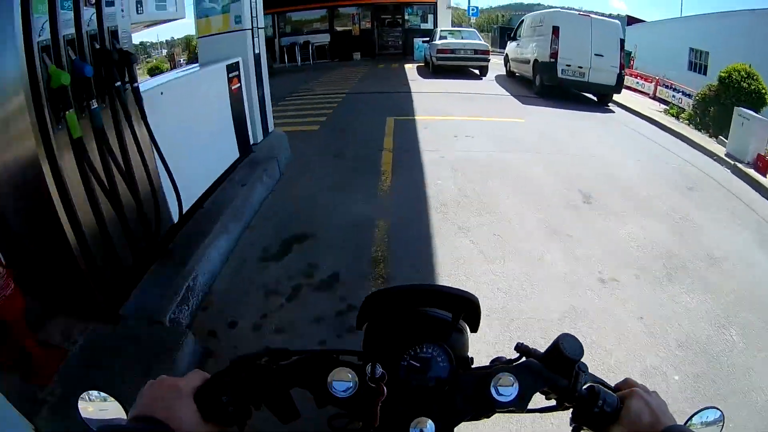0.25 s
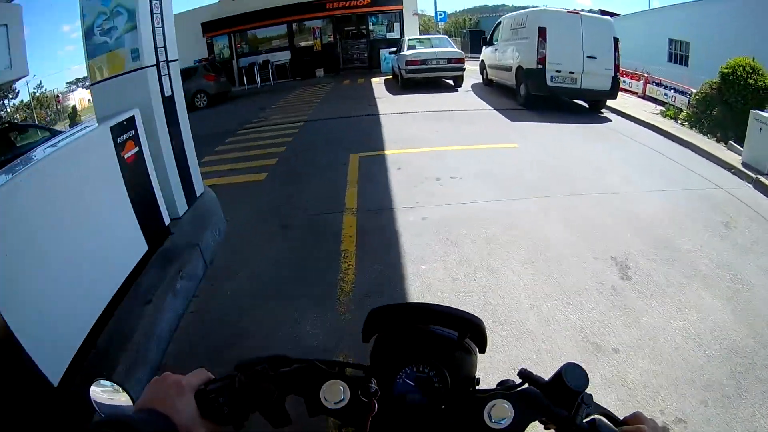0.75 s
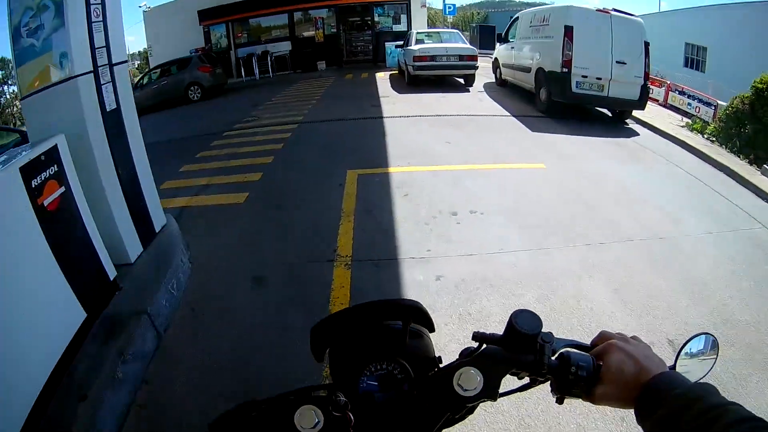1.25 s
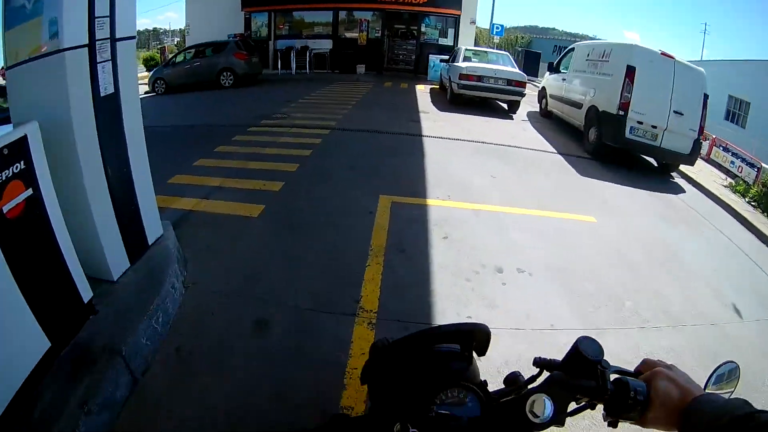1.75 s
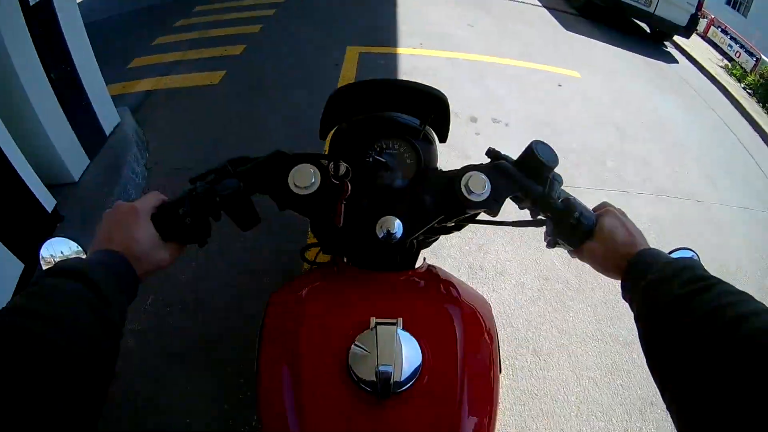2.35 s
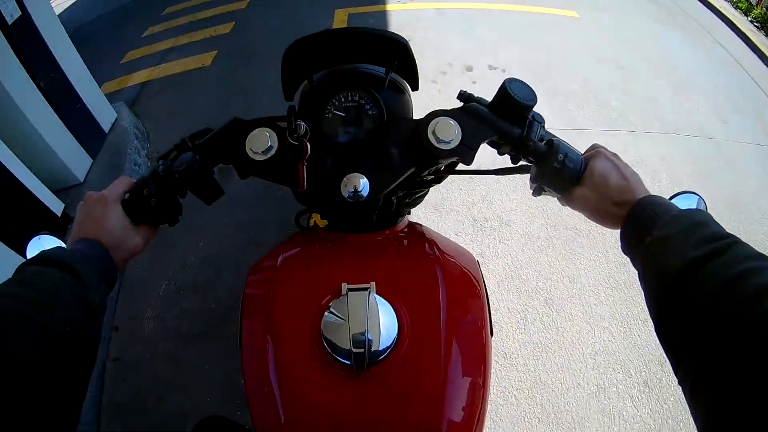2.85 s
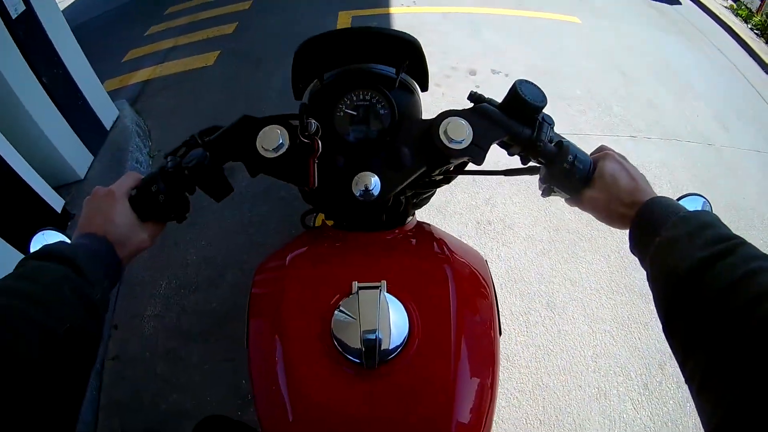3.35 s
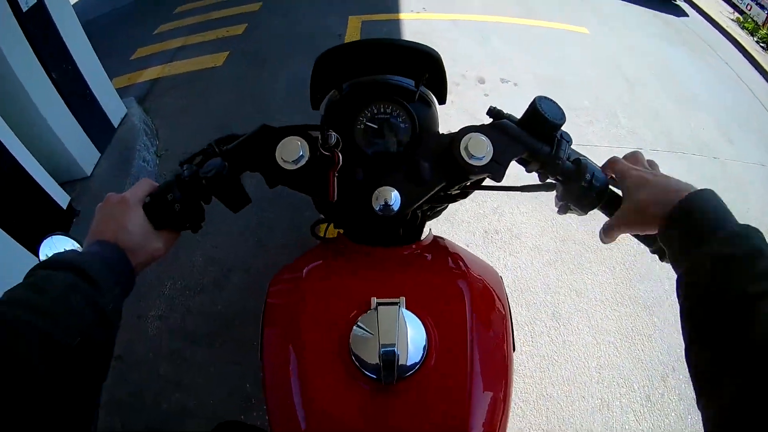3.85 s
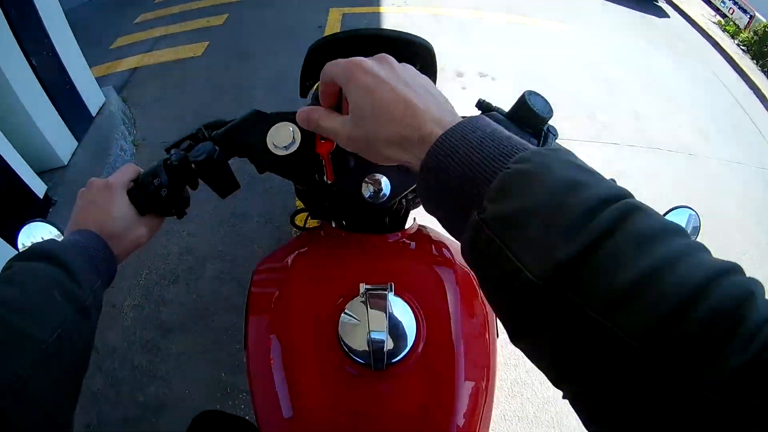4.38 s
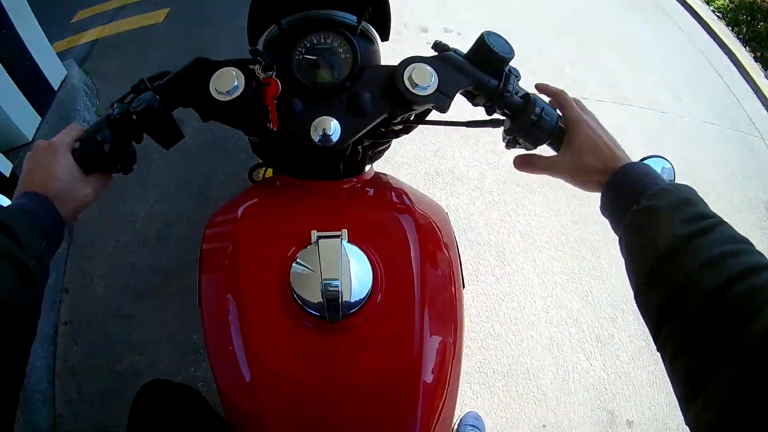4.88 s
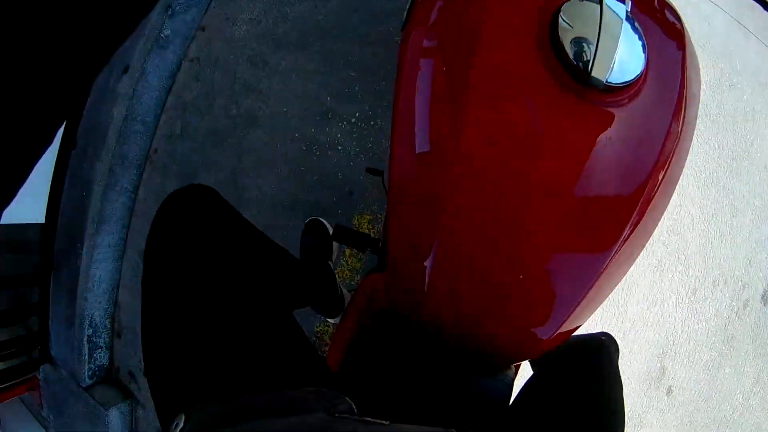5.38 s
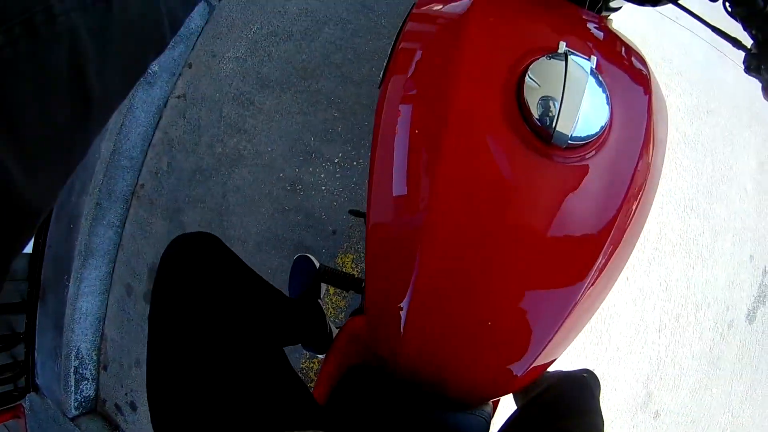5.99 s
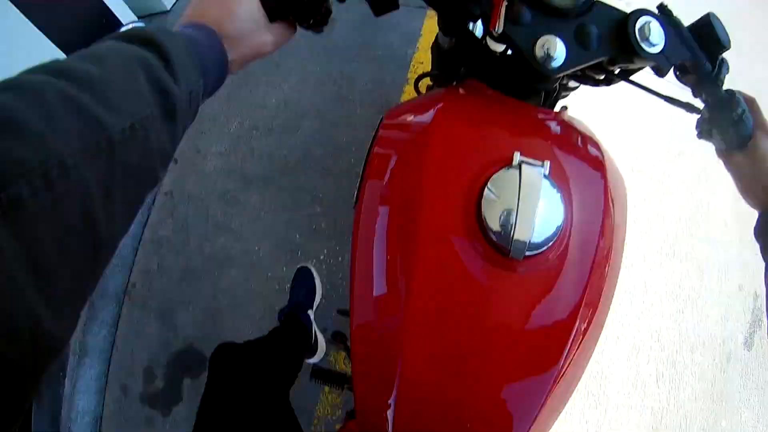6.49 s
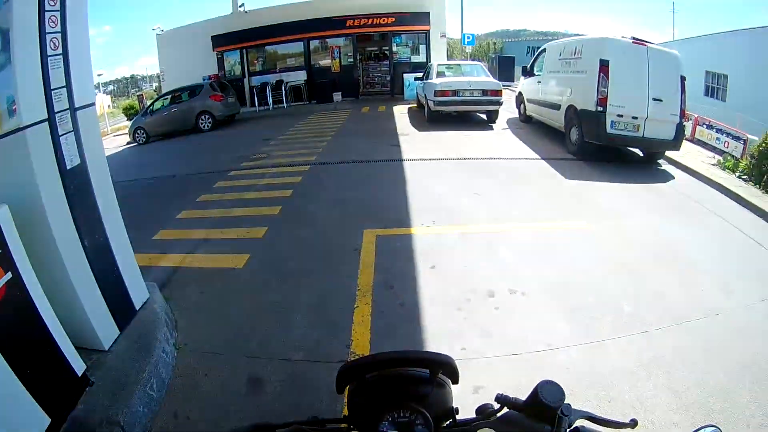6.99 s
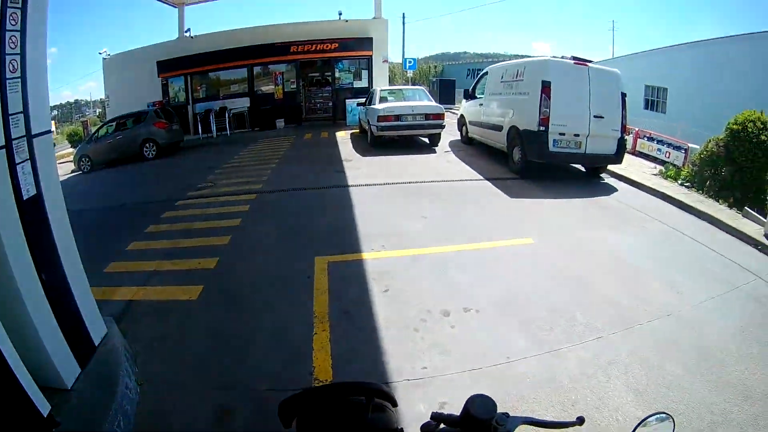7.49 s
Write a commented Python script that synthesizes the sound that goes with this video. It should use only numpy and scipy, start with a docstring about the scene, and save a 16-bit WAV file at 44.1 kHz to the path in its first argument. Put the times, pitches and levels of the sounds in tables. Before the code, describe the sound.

A motorcycle idles quietly at a fuel station and is switched off, then loud knocks and rubbing hit the microphone.

```python
"""A single-cylinder motorcycle idles over the traffic noise of a fuel station forecourt, each firing
ringing the exhaust, until the key clicks and it coasts to rest. The rider then handles the camera worn
on his body: hard knocks ring its plastic case and overload the microphone, the mount scrapes and
squeaks, and fingers bump and rub across the case."""
import sys
import numpy as np
from scipy import signal
from scipy.fft import rfft, irfft, next_fast_len
from scipy.io import wavfile

SR = 44100
rng = np.random.default_rng(int(sys.argv[2]) if len(sys.argv) > 2 else 0)


def to_wav(sig):
    """Store sig (one row per channel, or 1-D mono) as 16-bit WAV at the path in sys.argv[1].

    Samples outside -1..1 are clipped; the rate is SR.
    """
    pcm = np.clip(np.atleast_2d(sig), -1, 1) * 32767
    pcm = np.round(pcm).astype(np.int16)
    wavfile.write(sys.argv[1], SR, pcm.T)  # frames by channels


N = 340893
TIME_S = np.arange(N) / SR
STROKE_TIME_S = TIME_S[:round(.4 * SR)]  # time axis of one friction stroke


def amp(db):
    """Decibels to gain."""
    return 10 ** (np.asarray(db) / 20)


def unit_rms(x):
    """Scales to rms 1."""
    return x / np.sqrt(np.mean(x ** 2) + 1e-20)


def curve(rows, column=1):
    """One column of a time table, at every sample."""
    rows = np.array(rows)
    return np.interp(TIME_S, rows[:, 0], rows[:, column])


def spectrum_gain(spectrum, hz):
    """Gain of a spectrum table at hz."""
    points_hz, db = np.transpose(spectrum)
    return amp(np.interp(np.log(hz + 1), np.log(points_hz + 1), db))


def shaped(x, spectrum):
    """Filters x by (freq_hz, gain_db) points; rms 1."""
    size = next_fast_len(N)
    gain = spectrum_gain(spectrum, np.fft.rfftfreq(size, 1 / SR))
    return unit_rms(irfft(rfft(x, size) * gain, size)[:N])


def low_pass(x, hz, order):
    """Rolls off above hz."""
    return signal.sosfilt(signal.butter(order, hz, fs=SR, output="sos"), x)


def drift(rate_hz):
    """Smooth random wander; rms 1."""
    return unit_rms(low_pass(rng.standard_normal(N), rate_hz, order=2))


def add(mix, start_s, sound):
    """Mixes a sound in at start_s."""
    part = mix[max(round(start_s * SR), 0):][:len(sound)]
    part += sound[:len(part)]


def ring(hz, t60_s, size=4096):
    """One struck mode."""
    t = TIME_S[:size]
    return np.sin(2 * np.pi * hz * t) * np.exp(-np.log(1000) * t / t60_s)


def resonate(x, hz, t60_s):
    """Passes x twice through one mode; rms 1."""
    mode = ring(hz, t60_s)
    return unit_rms(signal.oaconvolve(x, signal.fftconvolve(mode, mode))[:len(x)])


def minimum_phase(gain):
    """The sharpest one-sided pulse with this spectrum; peak 1."""
    log_gain = np.log(np.concatenate([gain, gain[-2:0:-1]]) + 1e-6)
    pulse = np.fft.ifft(np.exp(np.conj(signal.hilbert(log_gain)))).real
    return pulse / abs(pulse).max()


def grit(slips_per_s, spread_db, hiss_gain, size=N):
    """Friction: tiny uneven slips over a smooth hiss; rms 1."""
    slips = (rng.random(size) < slips_per_s / SR) * rng.standard_normal(size)
    slips *= amp(spread_db * np.minimum(rng.exponential(1, size), 4))
    return unit_rms(unit_rms(slips) + hiss_gain * rng.standard_normal(size))


KEY_OFF_S, DIE_AWAY_S = 4.28, .082
# Idle stumbles: time_s, rate_drop_hz
STUMBLES = [(1.37, 1.8), (1.85, 1.8), (2.64, 1.6), (2.96, 3.2)]
# Firing strength: time_s, level_db
FIRING_LEVEL = [(0, -54), (.6, -56.5), (1.9, -56), (2.4, -54.5), (3.1, -55.5), (4.2, -55)]
# Firings that barely catch: time_s, dip_db
MISFIRES = [(.45, -8), (2.02, -6), (2.96, -11)]
def crank(idle_hz=13.043, start_cycle=.109, recover_s=.151, misfire_s=.04, coast_s=.65, pumping_db=-11):
    """Cycles run and stroke strength; after key-off the strokes only pump air and coast to rest."""
    sag_hz = sum(drop * (TIME_S > s) * np.exp(-abs(TIME_S - s) / recover_s) for s, drop in STUMBLES)
    off_s = np.maximum(TIME_S - KEY_OFF_S, 0)
    rate_hz = (idle_hz - sag_hz) * np.maximum(1 - off_s / coast_s, 0)
    misfire_db = sum(db * np.exp(-((TIME_S - s) / misfire_s) ** 2) for s, db in MISFIRES)
    cut_db = pumping_db * (1 - np.exp(-off_s / DIE_AWAY_S))
    strength = amp(curve(FIRING_LEVEL) + misfire_db + cut_db) * np.sqrt(rate_hz / idle_hz)
    return start_cycle + np.cumsum(rate_hz) / SR, strength


# Exhaust and frame modes: freq_hz, level_db, t60_s
EXHAUST_MODES = [(60.5, 1.5, 0.17), (98.4, 1, 0.081), (159.4, -5.5, .07), (226, -23, 0.13),
                 (272.3, 3, 0.17), (309.5, 2.5, 0.055), (428, -3, 0.041), (466, -11.5, 0.24)]
def engine(thump_db=10, thump_cutoff_hz=560, puff_s=.022, valve_gear_db=-8):
    """Every second turn a firing rings the exhaust and puffs out gas; the valve gear rustles along."""
    cycles, strength = crank()
    firings = np.flatnonzero(np.diff(np.floor(cycles)) > 0)
    thumps, kicks = np.zeros(N), np.zeros(N)
    kicks[firings] = 1
    for at, scatter in zip(firings, rng.standard_normal((len(firings), len(EXHAUST_MODES), 2))):
        modes = sum(amp(db + 2 * weight) * ring(hz * (1 + .02 * detune), t60_s, size=6144)
                    for (hz, db, t60_s), (weight, detune) in zip(EXHAUST_MODES, scatter))
        add(thumps, at / SR + .00239, strength[at] * modes)
    add(thumps, .0041, -.65 * thumps)  # suction wave from the open pipe end
    thumps = low_pass(thumps, thump_cutoff_hz, order=4)  # the valve opens gradually
    puff_envelope = signal.lfilter([1], [1, -np.exp(-1 / (puff_s * SR))], kicks)
    gas_spectrum = [(50, -15), (150, -34), (450, 26), (600, 14), (1000, 12), (2500, -40)]
    puffs = puff_envelope * shaped(rng.standard_normal(N), gas_spectrum)
    gear_spectrum = [(400, -2), (880, 0), (1550, 2.5), (2400, -25), (3600, -13.5),
                     (7000, -46), (14000, -50)]
    valve_gear = (1 + .37 * np.cos(4 * np.pi * cycles)) * shaped(grit(1200, 3.7, .62), gear_spectrum)
    return amp(thump_db) * thumps + strength * (puffs + amp(valve_gear_db) * valve_gear)


# Reflections off ground and pumps: delay_s, gain_db
ECHOES = [(.0098, -6.5), (0.0165, -7.5), (0.0278, -10)]
def near_echoes(x):
    """Adds the nearest reflections, which lengthen and roughen each beat."""
    out = x.copy()
    for delay_s, db in ECHOES:
        add(out, delay_s, amp(db) * x)
    return out


# Traffic through the case: freq_hz, density_db
TRAFFIC_SPECTRUM = [(60, -15.5), (180, -5), (480, -11), (750, -12), (1050, -6), (1300, -7), (1480, -0.5),
                    (1950, -11.5), (2400, -25.5), (2900, -31.5), (3550, -25.5), (5000, -36.5),
                    (11000, -42.5), (15000, -38)]
# Traffic loudness: time_s, level_db
TRAFFIC_LEVEL = [(0, -53), (1.8, -52.3), (2.9, -50), (4.65, -53.5), (5.1, -51), (6.4, -53), (7, -54.5)]
# Low rumble: freq_hz, density_db
RUMBLE_SPECTRUM = [(12, -21), (30, 0), (55, -5), (90, -7.5), (160, -31), (400, -59.5)]
# Rumble loudness: time_s, level_db
RUMBLE_LEVEL = [(0, -51.5), (1.3, -48.5), (4.1, -55), (4.7, -55.5), (5.4, -44.5), (6, -54.5), (6.7, -49.5),
                (7.7, -55.5)]
def forecourt(traffic_db=2, whirr_db=-8, whirr_hz=1490):
    """Distant traffic through the closed case, a wavering whirr at its resonance, and a low rumble."""
    traffic = shaped(rng.standard_normal(N), TRAFFIC_SPECTRUM) * amp(traffic_db + .1 * drift(18))
    whirr = resonate(rng.standard_normal(N), whirr_hz, t60_s=.02686) * amp(whirr_db + 3 * drift(21))
    rumble = shaped(rng.standard_normal(N), RUMBLE_SPECTRUM) * amp(curve(RUMBLE_LEVEL) + drift(6))
    return (traffic + whirr) * amp(curve(TRAFFIC_LEVEL)) + rumble


def electric_whine(pitch_hz=868, rms_db=-65):
    """The thin whine of the electrics, fading at key-off."""
    fade = np.exp(-np.maximum(TIME_S - KEY_OFF_S, 0) / DIE_AWAY_S)
    phase = 2 * np.pi * np.cumsum(pitch_hz + 2 * drift(3.9)) / SR
    return np.sqrt(2) * amp(rms_db) * fade * np.sin(phase)


# Faint rising tone: time_s, pitch_hz, level_db
FAR_TONE = [(0, 607, -69), (.05, 650, -47), (.09, 707, -57), (.14, 664, -62), (.2, 676, -100)]
def far_tone(octave_db=-4):
    """A brief, wavering far-off tone with its octave."""
    phase = 2 * np.pi * np.cumsum(curve(FAR_TONE) + 8 * drift(37.9)) / SR
    tone = np.sin(phase) + amp(octave_db) * np.sin(2 * phase)
    return np.sqrt(2) * amp(curve(FAR_TONE, column=2)) * tone


# Clicks of key and controls: start_s, level_db, decay_s
CLICKS = [(0.518, -59.5, .01), (0.666, -65, .015), (0.862, -58, 0.018), (0.915, -63, .03),
          (1.056, -59, 0.0084), (1.317, -57, 0.0088), (1.945, -61, 0.017), (2.49, -61, 0.015),
          (3.021, -53.5, .022), (4.361, -39, 0.0023), (4.924, -54, 0.013), (4.991, -59, 0.016),
          (6.296, -63, 0.056), (6.359, -63, 0.0097)]
# Modes of the key and its ring: freq_hz, level_db, t60_s
KEY_MODES = [(1600, 3, .008), (2950, -2, .012), (3450, -1, .009), (4150, 0, .01), (4650, -5, .009),
             (5650, -12, .015), (7000, -17, .01)]
def key_clicks():
    """Short bursts of tiny contacts ring the metal parts."""
    touch = np.zeros(N)
    for start_s, db, decay_s in CLICKS:
        add(touch, start_s, amp(db) * np.exp(-TIME_S[:SR] / decay_s))
    metal = sum((-1) ** k * amp(db) * ring(hz, t60_s) for k, (hz, db, t60_s) in enumerate(KEY_MODES))
    return signal.oaconvolve(touch * grit(1500, 1.4, .59), metal / np.linalg.norm(metal))[:N]


# Hand and body bumping the camera: start_s, push_db, cutoff_hz, sway_db
BUMPS = [(2.489, -25.5, 1500, -40.5), (5.057, -36, 600, -45), (5.109, -32.5, 800, -42),
         (5.202, -35, 700, -43), (5.247, -28.5, 900, -31), (5.289, -9, 266, -19), (5.406, -17, 500, -23),
         (5.517, -7.5, 451.8, -20), (5.644, -25.5, 497, -27.5), (5.984, -31.5, 1515, -50),
         (6.377, -42, 400, -36.5), (7.117, -24, 4050, -25), (7.142, -32, 200, -22),
         (7.288, -24.5, 6000, -51), (7.311, 6, 6000, -13.5), (7.389, -2, 3430, -11.5),
         (7.459, -5, 3600, -12.5), (7.472, 4.5, 2000, -15), (7.559, -25.5, 300, -18),
         (7.633, -43, 300, -24.5)]
# Air push in the case: freq_hz, gain_db
PUSH_SPECTRUM = [(20, -21), (60, 4.5), (150, 5), (430, 1), (750, -9), (1100, -5), (1700, -6), (2200, -8),
                 (2700, -31), (3800, -22), (5000, -44.5), (7000, -43.5), (12000, -55.5)]
def bumps(sway_hz=57, twist_hz=40, twist_db=-9, crunch_db=-8, crunch_s=.01, size=4096):
    """A soft blow pushes the air in the case, crunches, and rocks and twists the camera on its mount."""
    out, hz = np.zeros(N), np.fft.rfftfreq(size, 1 / SR)
    sway = ring(sway_hz, t60_s=.24, size=16384)
    twist = amp(twist_db) * ring(twist_hz, t60_s=.15, size=16384)
    for start_s, push_db, cutoff_hz, sway_db in BUMPS:
        crunch = rng.standard_normal(size) * np.exp(-TIME_S[:size] / crunch_s)
        force = signal.unit_impulse(size) + amp(crunch_db) * crunch / np.linalg.norm(crunch)
        gain = spectrum_gain(PUSH_SPECTRUM, hz) / np.hypot(1, (hz / cutoff_hz) ** 2)
        push = signal.fftconvolve(force, minimum_phase(gain))
        add(out, start_s, -amp(push_db) * push / abs(push).max())
        add(out, start_s, -amp(sway_db) * (sway - twist))
    return out


TILT_PIVOT_HZ = 1400
# Plastic case modes: freq_hz, level_db, t60_s
CASE_MODES = [(366, -31, .04), (680.4, -17, 0.025), (776, -15, 0.036), (1099, -17.5, 0.04),
              (1278, -3.5, 0.025), (1432.6, 3.5, 0.015), (1707, -11.5, 0.026), (1913, -9, 0.019),
              (2001, -18, 0.027), (2835, -21, 0.026), (3468, -26.5, 0.011), (4005, -24.5, 0.02),
              (4327, -20.5, 0.0086), (5500, -32.5, 0.017), (6780, -48, 0.0078)]
# Hard blows: start_s, peak_db, tilt_db_per_octave
KNOCKS = [(5.2851, 10.5, 12), (5.2893, 8, -0.5), (5.2957, 7, 9), (5.3065, -4, 5.5), (5.3195, -8.5, -9),
          (5.3995, -16, -7), (5.5155, 12, 6.5), (5.5191, 13, 4.5), (5.5287, 0, 6.5), (5.6425, 2, -3),
          (5.717, -21.5, -2.5), (5.727, -28, 8.5), (5.7355, -21, -3), (5.928, -31, 6.5), (5.9822, -12, 3),
          (6.0665, -27.5, 0.5), (6.1238, -15, -3), (6.133, -25, -5), (6.141, -26, -6.5), (6.364, -35.5, -3),
          (7.314, -14, 6.5)]
def knocks(sharpen_octaves_per_db=.003):
    """Each blow rings the case from another spot; harder contact is brighter and slightly sharper."""
    out = np.zeros(N)
    for start_s, peak_db, tilt in KNOCKS:
        spot = rng.uniform(-2.5, 1, (len(CASE_MODES), 2))
        sharpen = 2 ** (sharpen_octaves_per_db * (tilt - 1))
        blow = 0
        for k, ((hz, db, t60_s), (weight, detune)) in enumerate(zip(CASE_MODES, spot)):
            gain = amp(db + tilt * np.log2(hz / TILT_PIVOT_HZ) + 2 * weight)
            blow += (-1) ** k * gain * ring(hz * (1 + .015 * detune) * sharpen, t60_s)
        add(out, start_s, amp(peak_db) * blow / abs(blow).max())
    return out


def canopy_echoes(x, wet_db=-40, t60_s=.22, echoes_per_s=2000, predelay_s=.008):
    """Faint scattered echoes from the roof and pumps."""
    t = TIME_S[:SR // 2]
    taps = rng.standard_normal(len(t)) * (rng.random(len(t)) < echoes_per_s / SR)
    taps *= np.exp(-np.log(1000) * t / t60_s) * (t > predelay_s)
    return amp(wet_db) * signal.oaconvolve(x, taps / np.linalg.norm(taps))[:N]


def case_ring(tilt):
    """All modes of the case, tilted in dB per octave."""
    return sum((-1) ** k * amp(db + tilt * np.log2(hz / TILT_PIVOT_HZ)) * ring(hz, t60_s)
               for k, (hz, db, t60_s) in enumerate(CASE_MODES))


def swell(peak_s, db, rise_s, fall_s, span_db=20, lead_s=.15):
    """Friction gains span_db in rise_s and loses it in fall_s: start time and envelope."""
    t = STROKE_TIME_S - lead_s
    return peak_s - lead_s, amp(db - span_db * np.maximum(-t / rise_s, t / fall_s))


def press(start_s, length_s, db, attack_s, ease_db_per_s, lift_s=.0053):
    """A finger lands, eases off as it slides, and lifts: start time and envelope."""
    landing = np.minimum(STROKE_TIME_S / attack_s, 1) ** 2
    sliding = amp(db - ease_db_per_s * np.maximum(STROKE_TIME_S - attack_s, 0))
    lifting = np.exp(-np.maximum(STROKE_TIME_S - length_s, 0) / lift_s)
    return start_s, landing * sliding * lifting


# Mount scraping the case: peak_s, level_db, rise_s, fall_s, tilt_db_per_octave
SCRAPES = [(5.301, -13, 0.012, 0.034, 3.5), (5.375, -41, .07, .07, 3), (5.401, -13, 0.023, 0.0081, 5.5),
           (5.531, -46, 0.012, .04, 5), (5.675, -39.5, .02, 0.046, -10.5), (5.738, -26, .04, 0.048, -5),
           (5.932, -35.5, 0.015, 0.053, 1), (6.027, -40, 0.081, .04, -8.5)]
# Grip creaks: start_s, length_s, level_db, attack_s, ease_db_per_s, tilt_db_per_octave
CREAKS = [(7.314, 0.11, -32, 0.011, 105, -1), (7.5, 0.063, -27, 0.033, 279, 9),
          (7.572, .16, -40, 0.092, 7, -9)]
def scrapes_and_creaks():
    """Slips of the mount and creaks under the grip drive the modes of the case."""
    out = np.zeros(N)
    strokes = [(*swell(*shape), tilt) for *shape, tilt in SCRAPES]
    strokes += [(*press(*shape), tilt) for *shape, tilt in CREAKS]
    for start_s, force, tilt in strokes:
        slips = grit(2000, 2, .5, size=len(force))
        add(out, start_s, force * signal.fftconvolve(slips, case_ring(tilt))[:len(force)])
    return out / np.linalg.norm(case_ring(0))


# Mount squeaks: peak_s, level_db, rise_s, fall_s, pitch_hz
SQUEAKS = [(5.737, -27.5, 0.013, 0.028, 1913), (5.785, -30.5, 0.025, 0.0063, 1600),
           (5.83, -29, 0.0027, .007, 1440), (5.86, -32, 0.023, 0.021, 1410),
           (7.313, -14, 0.0021, 0.01, 1615), (7.349, -33.5, 0.053, .06, 1100)]
def squeaks():
    """Quick slips of the turning mount feed one narrow resonance of the case."""
    out = np.zeros(N)
    for *shape, pitch_hz in SQUEAKS:
        start_s, force = swell(*shape)
        slips = grit(3000, 1, 1, size=len(force))
        add(out, start_s, force * resonate(slips, pitch_hz, t60_s=.013))
    return out


# Finger slides: start_s, length_s, level_db, attack_s, ease_db_per_s
RUBS = [(7.117, 0.02, -36, 0.0027, 198.5), (7.286, .022, -38.5, 0.0033, 650),
        (7.306, 0.014, -26.5, 0.0074, 201), (7.342, 0.068, -36.5, 0.019, 41),
        (7.488, 0.168, -22, .028, 125), (7.649, 0.078, -47, .005, 11)]
# Skin on plastic: freq_hz, density_db
SKIN_SPECTRUM = [(80, 4), (350, 7.5), (650, -8.5), (1050, -1.5), (1550, 4), (2200, 1.5), (2700, -16.5),
                 (3400, -5.5), (4400, -10.5), (5400, -22), (6700, -23), (9200, -28.5), (11500, -28),
                 (15000, -39)]
def finger_rubs(judder_db=2.5, shudder_db=-2):
    """Skin dragged over the case near the microphone: fine grit over a low shudder."""
    pressure = np.zeros(N)
    for rub in RUBS:
        add(pressure, *press(*rub))
    hiss = shaped(grit(4000, 1.5, .8), SKIN_SPECTRUM) * amp(judder_db * drift(90))
    shudder_spectrum = [(20, -6), (60, 0), (110, -3), (320, -24.5), (600, -9.5), (1500, -48)]
    shudder = shaped(rng.standard_normal(N), shudder_spectrum)
    return pressure * (hiss + amp(shudder_db) * shudder)


def case_wall(x, notch_hz=7950, cutoff_hz=8200):
    """The wall passes little treble, and the cavity behind it cancels one band."""
    notched = signal.lfilter(*signal.iirnotch(notch_hz, Q=5, fs=SR), x)
    return low_pass(notched, cutoff_hz, order=5)


def scene():
    """Engine, forecourt and handling at one microphone."""
    hard = knocks()
    soft = np.tanh(bumps() + finger_rubs())  # the mount yields under the strongest pushes
    handling = case_wall(hard + canopy_echoes(hard) + scrapes_and_creaks() + squeaks() + soft)
    motorcycle = near_echoes(engine()) + electric_whine()
    return (motorcycle + far_tone() + forecourt() + key_clicks() + handling)[None]


def record(dry, cutoff_hz=15800):
    """The input clips flat at full scale, then is band-limited."""
    band_limit = signal.firwin(511, cutoff_hz, window=("kaiser", 9), fs=SR)
    return signal.oaconvolve(np.clip(dry, -1, 1), band_limit[None], "same")


dry = scene()
out = record(dry)
to_wav(out)
```